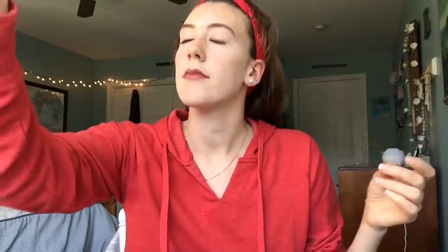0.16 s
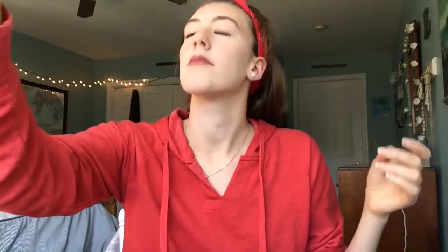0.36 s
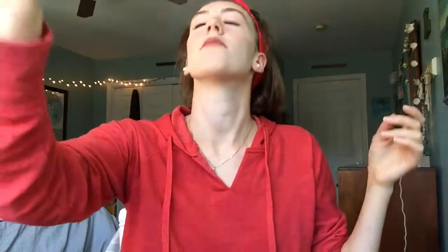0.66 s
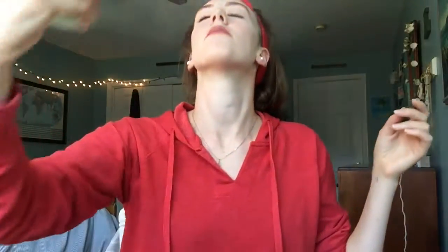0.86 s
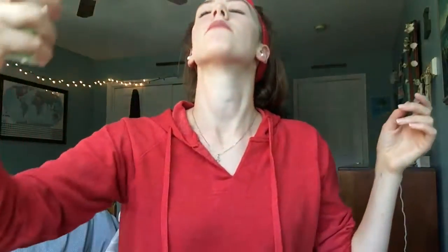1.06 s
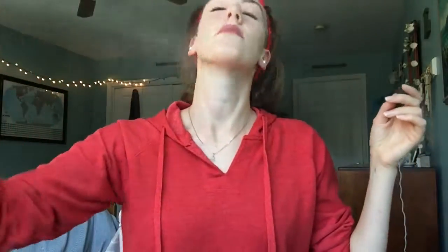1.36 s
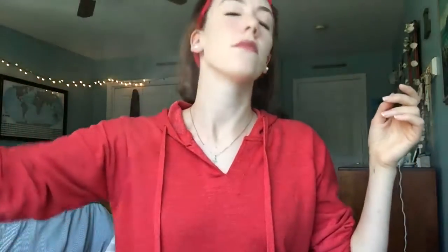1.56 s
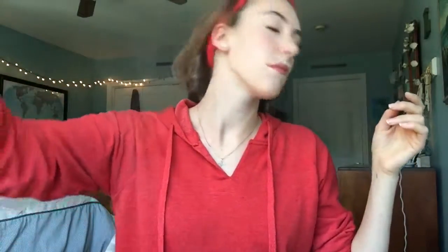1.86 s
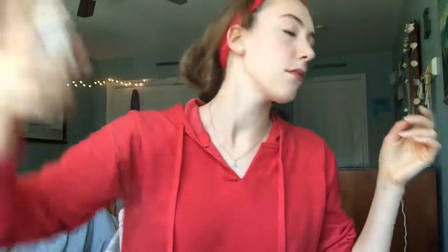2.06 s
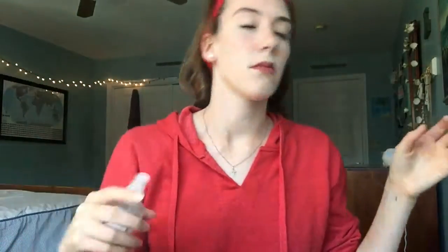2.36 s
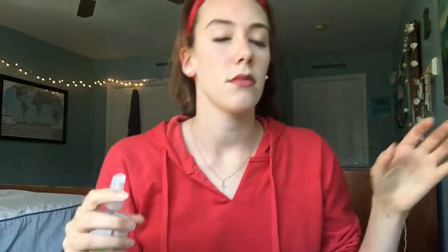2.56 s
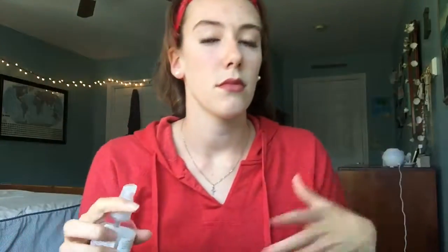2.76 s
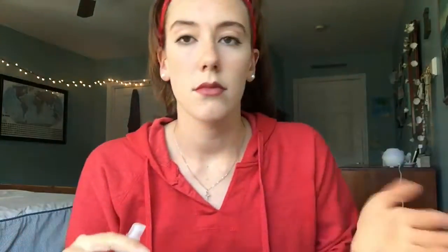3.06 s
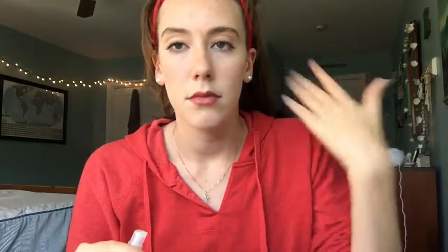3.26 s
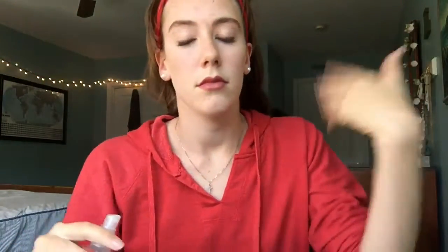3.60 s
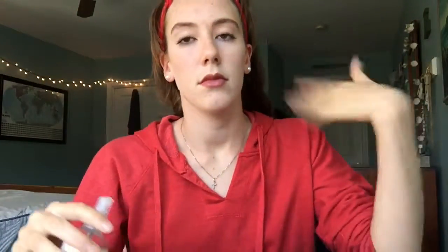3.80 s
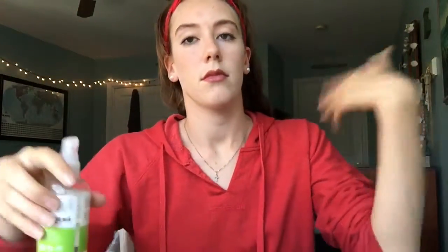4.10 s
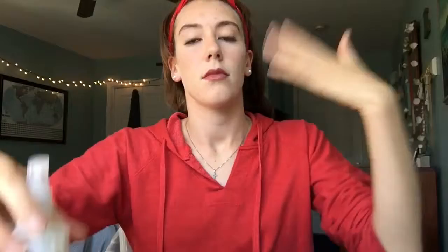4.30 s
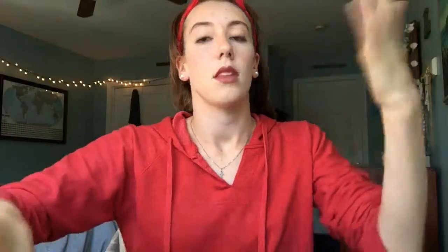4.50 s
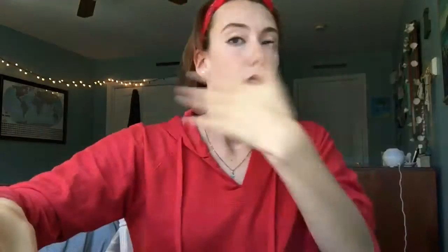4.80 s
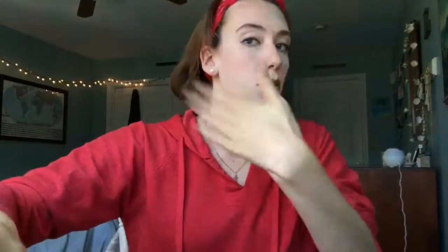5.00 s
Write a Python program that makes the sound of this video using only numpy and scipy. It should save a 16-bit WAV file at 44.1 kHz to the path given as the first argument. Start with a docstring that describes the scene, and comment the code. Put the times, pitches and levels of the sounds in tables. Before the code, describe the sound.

The setting is a quiet bedroom with slight reverberation, a faint low house rumble and steady microphone hiss. Close by, a small pump bottle sprays four times, at about 0.1, 0.7, 1.2 and 1.7 seconds. Each press gives a soft, dull plunger tap and a short, bright, slightly sputtering hiss of fine mist, the third a little stronger. Liquid blips very faintly inside the bottle, mostly around 2 seconds. Between 2.2 and 2.4 seconds the plastic cap and pump head click drily in the hand, with one more tiny tick near 2.9 seconds. Then only the room is heard until 4.6 seconds, when the bottle is set down on a wooden desk with a sharp knock and a low thud, the loudest moment. It rocks on its base, knocks again at 4.8 seconds and settles with a small rattle by 5 seconds.

```python
"""A quiet bedroom: faint house rumble and microphone hiss throughout.
From 0.1 to 1.9 s a small pump bottle is pressed four times, close by; each stroke taps the plunger
and hisses a fine mist. Liquid blips inside. From 2.2 s the cap and pump head click in the hand.
At 4.6 s the bottle is set down on a wooden desk, knocks, rocks on its base and settles."""
import sys
import numpy as np
from scipy import signal
from scipy.fft import rfft, irfft, next_fast_len
from scipy.io import wavfile
from scipy.ndimage import uniform_filter1d

SR = 44100
rng = np.random.default_rng(int(sys.argv[2]) if len(sys.argv) > 2 else 0)


def dump(signal):
    """Clip the signal to [-1, 1] and save it as 16-bit WAV at the path in sys.argv[1]."""
    limited = np.clip(np.atleast_2d(signal).T, -1, 1)
    pcm = np.round(limited * 32767).astype(np.int16)
    wavfile.write(sys.argv[1], SR, pcm)


N = 226850

# Pump strokes: start_s, length_s, mist_db, swell_db, bright_db, fullness_db, tilt_db_per_octave,
# band_hz, plunger_hz, break_free_db, bottom_out_db
STROKES = [(0.138, 0.17, -45.5, 4, 3, 0, 1.5, 3850, 840, -50, -74),
           (.685, 0.16, -44.5, 2.5, 4.5, -1, 0.5, 3900, 550, -52, -76),
           (1.188, 0.15, -41.5, -1, 4.5, 4.5, 1.8, 2470, 1060, -43.5, -45),
           (1.715, 0.14, -44.5, -2, 7, 2.5, 1, 2260, 1020, -48, -49.5)]


def amp(db):
    """dB to gain."""
    return 10 ** (np.asarray(db) / 20)


def unit(x):
    """Scale to rms 1."""
    return x / np.sqrt(np.mean(x ** 2) + 1e-20)


def along(points, hz):
    """Interpolate (freq_hz, value) points on a log frequency axis."""
    f, v = np.transpose(points)
    return np.interp(np.log(hz + 1), np.log(f + 1), v)


def filtered(x, response):
    """Apply the gain response(hz)."""
    m = next_fast_len(N + SR // 2)
    return irfft(rfft(x, m) * response(np.fft.rfftfreq(m, 1 / SR)), m)[..., :N]


def add(track, start_s, sound):
    """Mix sound into track."""
    track[round(start_s * SR):][:len(sound)] += sound


def rush(spectrum, patchy_db, frames):
    """Coloured noise, rms 1, with random gain patches about `frames` long."""
    z = signal.stft(rng.standard_normal(N + SR), nperseg=512)[2]
    patches = uniform_filter1d(rng.standard_normal(z.shape), size=4, axis=0)
    patches = uniform_filter1d(patches, size=frames, axis=1)
    noise = signal.istft(z * amp(patchy_db * unit(patches)), nperseg=512)[1][:N]
    return unit(filtered(noise, lambda hz: amp(along(spectrum, hz))))


def ring(modes, t, attack_s, detune, scatter_db):
    """Damped modes, new strengths per blow; grip and fill detune them slightly."""
    draws = rng.standard_normal((len(modes), 2))
    sines = (amp(db + scatter_db * a - 60 * t / t60_s) * np.sin(2 * np.pi * hz * np.exp(detune * b) * t)
             for (hz, db, t60_s), (a, b) in zip(modes, draws))
    return sum(sines) * (1 - np.exp(-t / attack_s))


def crack(t, t60_s):
    """Bright noise burst."""
    return amp(-60 * t / t60_s) * np.diff(rng.standard_normal(len(t) + 1))


def clack(t, hz, octaves, t60_s):
    """Noise burst through one broad resonance of the plastic, peak 1."""
    edges_hz = np.clip(hz * 2 ** (np.array([-.5, .5]) * octaves), 300, 16000)
    noise = amp(-60 * t / t60_s) * rng.standard_normal(len(t))
    burst = signal.lfilter(*signal.butter(2, edges_hz, "band", fs=SR), noise)
    return burst / np.abs(burst).max()


def noise_floor():
    """Gently swelling house rumble plus steady microphone hiss."""
    rumble_spectrum = [(15, -44), (25, -0.5), (48, 1.5), (69, -1), (102, 0.5), (166, 0.5), (190, -3),
                       (211, -9.5), (249, -7.5), (400, -23.5), (520, -34.5), (880, -120)]  # freq_hz, density_db
    rumble_curve = [(0.0, -68), (0.45, -70.5), (0.68, -70), (0.88, -67), (1.23, -68.5), (1.34, -67.5),
                    (2.51, -69.5), (2.59, -69), (3.22, -71), (3.42, -69.5), (4.252, -70), (4.5, -67)]  # time_s, relative_db
    hiss_spectrum = [(180, -11), (300, -6.5), (360, -11), (418, -12.5), (486, -10.5), (546, -9.5),
                     (667, -10.5), (814, -14.5), (856, -10.5), (930, -12.5), (2210, -16), (2740, -16.5),
                     (6000, -17.5), (15200, -30.5), (16000, -14.5)]  # freq_hz, density_db
    rumble_db = np.interp(np.arange(N) / SR, *np.transpose(rumble_curve)) + 5
    rumble = amp(rumble_db) * rush(rumble_spectrum, patchy_db=1.05, frames=12)
    return rumble + amp(-68.5) * rush(hiss_spectrum, patchy_db=1.0, frames=12)


def room(x):
    """Wall reverb, decay per frequency; the tail changes as the bottle moves."""
    wall_decay = [(200, 0.26), (1000, 0.43), (4000, 0.26), (12000, 0.243)]  # freq_hz, t60_s
    wet, step = np.zeros(N + 2 * SR), SR // 12
    for start in range(0, N, step):
        hz, t, z = signal.stft(rng.standard_normal(SR // 2), SR, nperseg=256)
        tail = signal.istft(z * amp(-60 * t / along(wall_decay, hz)[:, None]), SR, nperseg=256)[1]
        add(wet, (start + 200) / SR, signal.fftconvolve(x[start:start + step], tail / np.linalg.norm(tail)))
    return wet[:N]


def bubbles():
    """Blips in the liquid: soft onset, rising pitch; low ones last longer."""
    blips = [(.477, -67, 635), (1.434, -61, 2240), (1.925, -66.5, 604), (1.926, -68, 1970),
             (2.062, -65, 1810), (2.085, -58.5, 1055), (2.195, -64, 2260), (2.287, -61, 550),
             (2.378, -58, 1162), (2.938, -66, 620)]  # start_s, level_db, nominal_hz
    out, t = np.zeros(N + SR), np.arange(SR // 10) / SR
    for start_s, db, hz in blips:
        life_s = 0.019 * np.sqrt(1000 / hz)
        age = np.minimum(t / life_s, 1)
        tone = np.sin(2 * np.pi * hz * t * (0.953 + 0.034 * age))
        noise = amp(0.5) * clack(t, hz, octaves=1.0, t60_s=.1)
        add(out, start_s, amp(db) * np.sin(np.pi * age) ** 2 * (tone + noise))
    return out[:N]


def cap_clicks():
    """Cap and pump head click drily in the hand."""
    clicks = [(2.185, -55, 4730, 0.019, -16), (2.196, -55, 4600, .015, -21),
              (2.2319, -31.5, 2720, 0.013, -11.5), (2.235, -42.5, 2360, 0.032, -16),
              (2.241, -42.5, 3300, 0.011, -24), (2.25, -51, 2940, .03, -13), (2.267, -60, 2820, 0.019, -30),
              (2.289, -52, 2760, 0.1, -29), (2.302, -53, 5150, .012, -29), (2.372, -38.5, 4470, 0.022, -17),
              (2.38, -42, 5200, 0.058, -7), (2.382, -49.5, 2180, 0.093, -2), (2.4, -46.5, 4800, 0.017, 2),
              (2.946, -59, 6140, 0.038, -10), (4.512, -68, 8600, 0.027, 6.5),
              (4.593, -41, 4340, 0.046, -18.5)]  # start_s, level_db, centre_hz, t60_s, crack_relative_db
    out, t = np.zeros(N + SR), np.arange(SR // 10) / SR
    for start_s, db, hz, t60_s, crack_db in clicks:
        body = clack(t, hz, octaves=0.68, t60_s=t60_s)
        add(out, start_s, amp(db) * (body + amp(crack_db) * crack(t, t60_s=0.018)))
    return out[:N]


def plunger():
    """Dull taps as the plunger breaks free and bottoms out."""
    partials = [(1, 2.5), (.52, -6), (.73, -5.5), (1.35, 1)]  # pitch_ratio, level_db
    t60_s = 0.021
    out, t = np.zeros(N + SR), np.arange(SR // 10) / SR
    for start_s, length_s, *_, hz, free_db, bottom_db in STROKES:
        modes = [(ratio * hz, db, t60_s) for ratio, db in partials]
        for tap_s, db in (start_s, free_db), (start_s + length_s, bottom_db):
            add(out, tap_s, amp(db) * ring(modes, t, attack_s=0.00075, detune=0.07, scatter_db=3))
    return out[:N]


def chatter(per_run):
    """Small uneven contacts fading as the base settles; rows like the blows in knocks()."""
    runs = [(4.605, 0.096, -41), (4.804, 0.044, -40), (4.875, .12, -41)]  # start_s, length_s, level_db
    nominal_hz, t60_s, fade_db = 2580, 0.015, 15
    rows = []
    for start_s, length_s, level_db in runs:
        for k, (jitter, pitch_draw) in enumerate(rng.random((per_run, 2))):
            progress = (k + jitter) / per_run
            db = level_db - fade_db * progress
            hz = nominal_hz * (0.755 + 0.61 * pitch_draw)
            rows.append((start_s + length_s * progress, db, hz, t60_s, db + 2, db - 20, db - 28))
    return rows


def knocks():
    """Each contact rings the rim and rattles the shell; the desk top swings down just after."""
    # Bottle on desk: start_s, rim_db, rim_hz, rim_t60_s, shell_db, thud_db, crack_db
    blows = [(4.6038, -2, 2560, .012, -16, 0, -40), (4.62, -15, 2250, .012, -27, -10, -47),
             (4.627, -28, 2230, .03, -36, -43, -64), (4.67, -34, 2620, .007, -35, -20, -60),
             (4.712, -50, 2500, .01, -55, -26, -75), (4.8044, -5, 2700, .0035, -27, -49, -54),
             (4.8145, -24, 3190, .009, -38, -59, -62), (4.822, -26, 3040, .012, -38, -61, -63),
             (4.829, -25, 3300, .01, -41, -56, -65), (4.834, -32, 3100, .012, -42, -58, -65),
             (4.838, -32, 2900, .016, -44, -63, -65), (4.8705, -30, 2330, .006, -32, -42, -44),
             (4.925, -35, 2180, .01, -37, -57, -46), (4.96, -44, 2080, .012, -41, -54, -66),
             (4.981, -47, 2670, .012, -45, -46, -71)]
    shell_modes = [(637, -7.5, 0.026), (797, -9.5, 0.019), (1147, -1, 0.013), (1530, -5, 0.015),
                   (1656, -2, 0.013), (1980, -2, 0.018), (2900, -6, 0.013), (3630, -9, 0.0047),
                   (4770, -13.5, 0.0031), (6040, -0.5, 0.0049), (7460, -31, .004)]  # plastic: freq_hz, level_db, t60_s
    desk_modes = [(75, -18, .26), (96, -26, .26), (123, -33, .3), (132, -2.5, .075), (158, -4.5, .063),
                  (187, -2, .05), (223, -8.5, .075), (237, -34, .4), (335, -26, .04)]  # damped thud over faint lasting modes: freq_hz, level_db, t60_s
    bottle, desk = np.zeros((2, N + SR))
    t, t_long = np.arange(SR // 10) / SR, np.arange(SR // 2) / SR
    for start_s, db, hz, t60_s, shell_db, thud_db, crack_db in blows + chatter(per_run=9):
        rim = amp(db) * ring([(hz, 0, t60_s)], t, attack_s=.0007, detune=.006, scatter_db=.5)
        clatter_db = -16 + 0.81 * db  # grows slower than the rim
        clatter = amp(clatter_db) * clack(t, hz=2950, octaves=.85, t60_s=1.6 * t60_s)
        shell = amp(shell_db) * ring(shell_modes, t, attack_s=0.00075, detune=0.057, scatter_db=4.5)
        add(bottle, start_s, rim + clatter + shell + amp(crack_db) * crack(t, t60_s=0.013))
        thud = -amp(thud_db) * ring(desk_modes, t_long, attack_s=.01, detune=.002, scatter_db=.5)
        add(desk, start_s + .0042, thud)
    return bottle[:N], desk[:N]


def spray():
    """Liquid tears into droplets at the nozzle: turbulent, sputtering noise, brightest mid-stroke."""
    mist_spectrum = [(290, -33), (520, -31), (880, -21), (1400, -10.5), (1580, -15.5), (1800, -4),
                     (2400, -1.5), (2900, -3), (3800, -3), (5000, -4.5), (6500, -5.5), (10400, -16),
                     (16000, -14.5)]  # freq_hz, density_db
    attack_s, attack_db, arch_db, release_db_per_s = 0.0047, 15.5, 1.5, 998
    band_db, band_octaves = 3.5, 0.067  # strongest band; shifts as the hand turns the nozzle
    t, mist = np.arange(N) / SR, np.zeros(N)
    sputter = amp(0.44 * unit(uniform_filter1d(rng.standard_normal(N), size=40)))
    for start_s, length_s, db, swell_db, bright_db, fullness_db, tilt, band_hz, *_ in STROKES:
        def colour(hz):
            low_db = fullness_db / (1 + (hz / 1500) ** 6)
            slope_db = tilt * np.log2(np.clip(hz, 1500, 7000) / 3500)
            peak_db = band_db * np.exp(-(np.log2((hz + 1) / band_hz) / band_octaves) ** 2)
            return amp(low_db + slope_db + peak_db)

        jet = unit(sputter * filtered(rush(mist_spectrum, patchy_db=2.85, frames=16), colour))
        treble = filtered(jet, lambda hz: 1 / (1 + (7500 / (hz + 1)) ** 4))
        age_s = t - start_s
        progress = np.clip(age_s / length_s, 0, 1)
        arch = np.sin(np.pi * progress)
        opening_db = attack_db * np.clip(1 - age_s / attack_s, 0, 1)
        collapse_db = release_db_per_s * np.maximum(age_s - length_s, 0)
        level_db = db + swell_db * progress + arch_db * arch - opening_db - collapse_db
        mist += (age_s >= 0) * amp(level_db) * (jet + (amp(bright_db * arch) - 1) * treble)
    return mist


def scene():
    """Mono mix: bottle, desk, wall reverb, noise floor."""
    mist = spray()
    handling = plunger() + cap_clicks() + bubbles()
    bottle, desk = knocks()
    walls = room(amp(-13.5) * mist + amp(-12.5) * handling + amp(-14.5) * bottle)
    return (mist + handling + bottle + desk + walls + noise_floor())[None]


def record(dry):
    """The microphone colours the treble and drops deep bass; the camera limits the band."""
    housed_mic = [(4300, 0), (5000, -3), (5600, 0), (9300, 1.5), (10400, -1.5), (11400, 1.5), (13500, 0),
                  (15500, -2.5)]  # freq_hz, gain_db
    pole_hz, top_hz = 45, 15750

    def response(hz):
        highpass = (1j * hz / (pole_hz + 1j * hz)) ** 3
        return (hz < top_hz) * amp(along(housed_mic, hz)) * highpass

    return filtered(dry, response)


dry = scene()
out = record(dry)
dump(out)
```